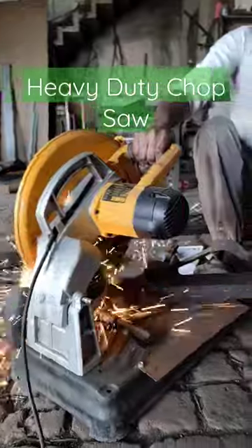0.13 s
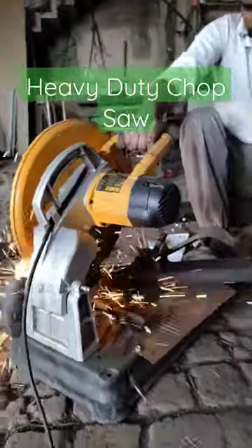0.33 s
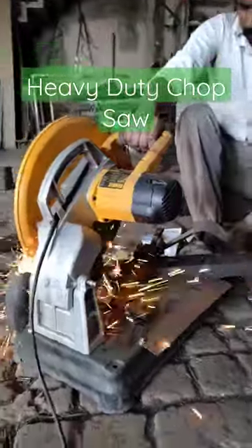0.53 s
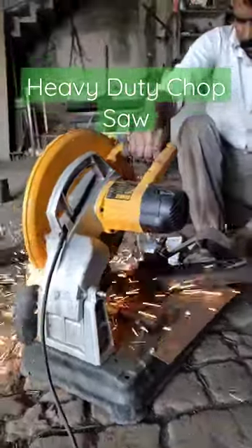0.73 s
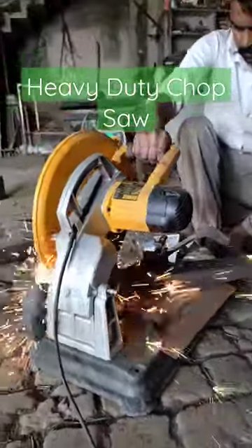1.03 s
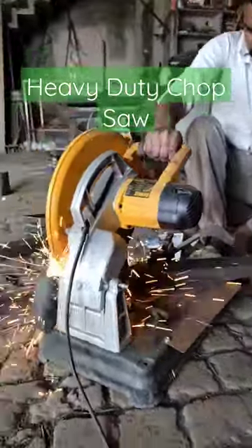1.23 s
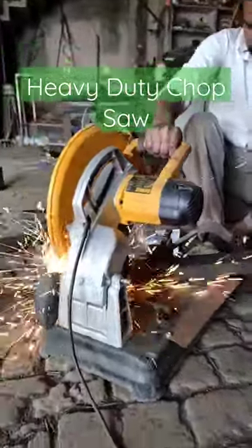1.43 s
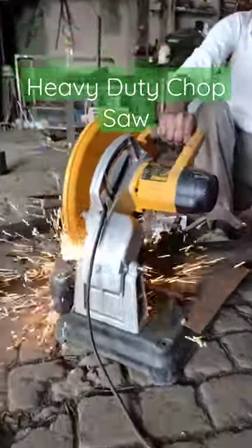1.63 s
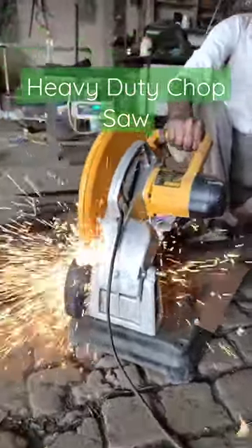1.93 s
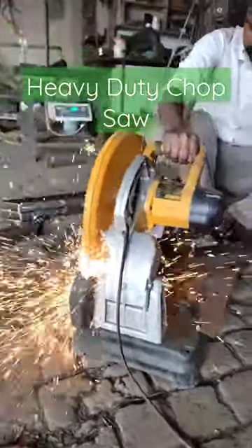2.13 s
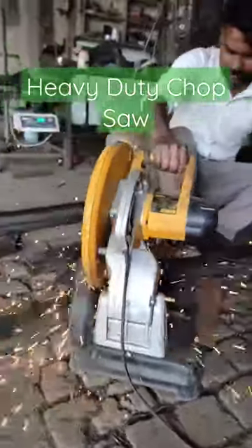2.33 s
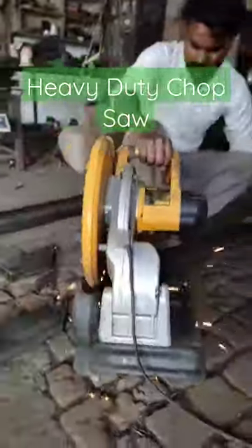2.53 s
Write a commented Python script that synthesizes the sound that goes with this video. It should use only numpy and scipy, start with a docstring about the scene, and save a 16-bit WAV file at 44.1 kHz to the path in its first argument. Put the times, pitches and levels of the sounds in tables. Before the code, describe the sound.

An abrasive chop saw grinds through steel, its whine sagging under load, then rising as it lifts.

```python
"""Gritty scraping and a sagging whine: an abrasive chop saw cuts steel about a metre away on a workshop floor.
Shaped noise and random clicks make the grit and sparks; narrowband noise makes steel, wheel and guard ring.
Fluttering sines make the motor whine, which sags as the wheel bites and rises when it lifts, a wavering snarl,
and a mains buzz that is strongest under the heaviest load. Brief squeals and a last rising ring join them;
decaying noise tails smear the sounds as a room does, and two differing channels give them width."""
import sys
import numpy as np
from scipy import signal
from scipy.fft import rfft, irfft
from scipy.io import wavfile
from scipy.ndimage import uniform_filter1d

SR = 44100
rng = np.random.default_rng(int(sys.argv[2]) if len(sys.argv) > 2 else 0)


def wav_out(sig):
    """Save sig, one row per channel (or a flat mono array), as 16-bit PCM at SR to the path in sys.argv[1]."""
    wavfile.write(sys.argv[1], SR, np.round(np.clip(np.atleast_2d(sig).T, -1, 1) * 32767).astype(np.int16))


N = 118188
T = np.arange(N) / SR  # time in s
HZ = np.maximum(np.fft.rfftfreq(N, 1 / SR), 1)

# crossovers from bass to middle and from middle to treble: split_hz
SPLIT_HZ = [900, 3500]
PINION_TEETH = 16  # gear mesh cycles per shaft turn
RIPPLE_FROM_HZ = 1800  # fine treble structure reaches full depth about here
ROOM_DB = 3  # reverberant level relative to the direct sound


def undb(db):
    """Level law: decibels become an amplitude ratio."""
    return 10 ** (np.asarray(db) / 20)


def unit(x):
    """Normalisation: scale to a root mean square of 1."""
    return x / np.sqrt(np.mean(x ** 2))


def follow(points):
    """Envelope: gain over time through (s, dB) points."""
    return undb(np.interp(T, *np.array(points).T))


def pan(db):
    """Interchannel level difference: left and right gains at constant mean power."""
    gains = undb(np.array([np.atleast_1d(db), -np.atleast_1d(db)]) / 2)
    return gains / np.sqrt(np.mean(gains ** 2, axis=0))


def across(points):
    """Spectral envelope: interpolate (Hz, value) points along log frequency."""
    hz, value = np.array(points, float).T
    return np.interp(np.log(HZ), np.log(hz), value)


def wander(hz):
    """Low-pass noise: random motion up to about the given rate, rms 1."""
    return unit(irfft(rfft(rng.standard_normal(N)) / (1 + (HZ / hz) ** 2), N))


def turn(hz):
    """Phase in radians: frequency summed over time from a random start."""
    return 2 * np.pi * (np.cumsum(hz * np.ones(N)) / SR + rng.random())


def room(x, wet_db):
    """Reverberation: convolve with exponentially decaying noise, independent in each channel."""
    decay_time_s = 0.42  # time to fall by 60 dB
    age = T[:SR // 3]
    tail = rng.standard_normal((2, len(age))) * undb(-60 * age / decay_time_s)
    tail /= np.sqrt(np.sum(tail ** 2, axis=1, keepdims=True))
    reverberant = signal.fftconvolve(tail, x[None], axes=1)[:, :N]
    wet = undb(wet_db)
    return (x + wet * reverberant) / np.sqrt(1 + wet ** 2)


def tone(phase, flutter_db, flutter_hz, jitter):
    """Random modulation: a partial flutters in level (dB) and phase (radians), rms 1."""
    carrier = np.sin(phase + jitter * wander(flutter_hz))
    return unit(carrier * undb(flutter_db * wander(flutter_hz)))


def contact(mesh):
    """Amplitude modulation: pressure rises once per wheel turn, and random chatter shakes it."""
    gear_ratio, wobble, chatter_db = 5.3, .05, .45
    wheel_hz = mesh / PINION_TEETH / gear_ratio
    return (1 + wobble * np.sin(turn(wheel_hz))) * undb(chatter_db * wander(31))


def treble_ripple():
    """Spectral ripple: narrow random peaks and valleys roughen the treble of the grinding."""
    grid = np.arange(0, SR / 2, 70)  # one random level every 70 Hz
    deviation_db = np.clip(rng.standard_normal(len(grid)), -2, 2) * np.sqrt(2)
    onset = np.minimum(HZ / RIPPLE_FROM_HZ, 1)
    return unit(undb(onset * np.interp(HZ, grid, deviation_db)))


def sparks():
    """Impulsive noise: torn-off grains make randomly timed clicks, a few much louder than the rest."""
    clicks_per_s, size_spread_db = 1600, 2.5
    size = undb(size_spread_db * np.minimum(rng.exponential(size=N), 6))
    struck = rng.random(N) < clicks_per_s / SR
    return unit(room(size * rng.standard_normal(N) * struck, wet_db=0.5))


def grinding(pressure):
    """Broadband friction: grit noise and sparks share a spectrum whose three bands have their own envelopes."""
    # spectrum of the grinding noise: frequency_hz, relative_density_db
    spectrum_points = [(18, -68), (30, -36), (123, -12.5), (256, -9.5), (292, -9.5), (369, -5.5),
                       (399, -8.5), (467, -3.5), (505, -7), (561, -7), (709, -7), (808, -5.5), (945, -6),
                       (1400, -6.5), (1720, -4), (2620, -6.5), (4090, -7), (4540, -5), (5740, -8.5),
                       (8950, -13), (12300, -11), (14300, -12.5), (15500, -19.5)]
    # level of the grinding about each band's mean: time_s, bass_db, middle_db, treble_db
    band_levels = [(0.2, -25.5, -18.5, -19), (0.24, -21, -20, -17.5), (0.37, -25.5, -17.5, -15.5),
                   (0.39, -24, -21, -18.5), (1.77, -23.5, -19.5, -17.5), (1.87, -21, -19, -16),
                   (2.27, -22, -18, -18), (2.39, -19.5, -19, -17.5), (2.46, -21.5, -21.5, -19.5),
                   (2.55, -21, -23, -16), (2.6, -24.5, -22, -16.5)]
    # difference between the two microphones: frequency_hz, left_right_db
    channel_shade = [(100, -1), (250, -1), (420, -1), (800, 1.5), (1200, 0.5), (1800, 0.5), (3000, -1),
                     (5000, -2.5), (7200, -4), (9000, -1), (11000, 5.5), (11800, 6), (14000, 2)]
    # likeness of the scraping at the two microphones: frequency_hz, correlation
    channel_likeness = [(40, 0.61), (150, 0.12), (240, 0), (320, 0.75), (600, 0.39), (1300, 0.12),
                        (3000, 0.0035), (12000, 0)]
    scrape_db, spark_db = -12, -26

    mid, side = rfft(rng.standard_normal((2, N)))
    alike = np.clip(across(channel_likeness), -.95, .95)
    opposed = np.array([[1], [-1]]) * side
    scrape = (mid * np.sqrt(1 + alike) + opposed * np.sqrt(1 - alike)) / np.sqrt(2)
    source = undb(scrape_db) * scrape + undb(spark_db) * rfft(sparks())
    colour = unit(undb(across(spectrum_points))) * treble_ripple()
    sound = source * colour * pan(across(channel_shade))

    bass, below_treble = (1 / (1 + (HZ / hz) ** 4) for hz in SPLIT_HZ)
    times, *levels = np.array(band_levels).T
    out = 0
    for band, db in zip([bass, below_treble - bass, 1 - below_treble], levels):
        out = out + irfft(sound * band, N) * undb(np.interp(T, times, db - np.mean(db)))
    return pressure * out


def rasp(x, count=5):
    """Independent band modulation: interleaved treble bands flicker at random, each on its own."""
    depth_db, rate_hz, spacing_hz = 2.4, 28, 260
    spectrum, out = rfft(x), x
    treble = 1 - 1 / (1 + (HZ / RIPPLE_FROM_HZ) ** 4)
    for k in range(count):
        # triangular bands that add up to 1 over all k
        comb = np.maximum(1 - np.abs((HZ / spacing_hz + k) % count - 1), 0)
        flicker = unit(undb(depth_db * wander(rate_hz)))
        out = out + irfft(spectrum * treble * comb, N) * (flicker - 1)
    return out


def ringing(load, pressure):
    """Resonance: rubbed guard, steel and wheel ring as narrowband noise, lower in pitch under load."""
    # resonances running freely and under the heaviest load:
    # free_hz, heavy_hz, width_hz, free_db, heavy_db, left_right_db
    resonances = [(429.8, 415, 96, -37.5, -26.5, 8.5), (819, 805, 51, -46, -27, 12),
                  (1810, 1600, 300, -25, -30.5, -1), (4660, 4500, 440, -39, -36, 0)]
    ring_fade_s, fade_db_per_s = 2.25, -36  # the rings die away from here, late in the heavy cut
    bass_room_db = -15
    rubbing = pressure * undb(fade_db_per_s * np.maximum(T - ring_fade_s, 0))
    out = 0
    for free_hz, heavy_hz, width, free_db, heavy_db, pan_db in resonances:
        phase = turn(free_hz + (heavy_hz - free_hz) * load)
        ring = unit(wander(width / 2) * np.cos(phase) + wander(width / 2) * np.sin(phase))
        level = undb(free_db + (heavy_db - free_db) * load)
        wet_db = bass_room_db if free_hz < SPLIT_HZ[0] else ROOM_DB
        out = out + pan(pan_db) * room(ring * rubbing * level, wet_db)
    return out


def whine(mesh, load):
    """Order tracking: gear, fan and bearing partials keep fixed ratios to the shaft as load shifts their levels."""
    # shaft hum: time_s, level_db
    shaft_level = [(.13, -38), (.38, -37), (.46, -31.5), (.74, -30.5), (.84, -40), (2.68, -50.5)]
    # gear mesh whine: time_s, level_db
    mesh_level = [(.13, -25.5), (.33, -23), (.45, -27.5), (.7, -27.5), (.95, -25), (1.08, -30),
                  (1.18, -28.5), (1.3, -36), (1.6, -33), (1.8, -45), (2.05, -31), (2.2, -23.5), (2.27, -35),
                  (2.37, -32), (2.42, -20.5), (2.5, -22), (2.54, -31), (2.68, -37)]
    # second, lower whine: time_s, level_db
    lower_level = [(.13, -36), (.42, -29), (.55, -36), (.77, -38), (.83, -24), (1.02, -24), (1.07, -28),
                   (1.2, -23), (1.38, -22), (1.5, -25.5), (1.65, -26.5), (1.8, -52)]
    # third, lowest whine: time_s, level_db
    lowest_level = [(.13, -29), (.35, -28.5), (.5, -31), (.63, -22), (.74, -23), (.85, -38), (1.2, -50)]
    # weaker partials: multiple_of_shaft_rate
    weak_orders = [1.28, 3.03, 3.53, 3.81, 4.06, 4.42, 4.84, 5.88, 6.94, 17.83, 22.53]
    # their levels before release, in the same order: free_db, cutting_db, heavy_db, left_right_db
    weak_levels = [(-30, -31.5, -42, -1), (-34, -38, -52, 11), (-33, -40, -34, 3), (-35, -78, -32, 9),
                   (-45, -27.5, -71, 4), (-25, -32.5, -48, 10), (-62, -32, -31.5, -4), (-29, -30.5, -53, 5),
                   (-27, -37.5, -53, -1), (-83, -80, -52, -3), (-34.5, -39, -36, 10)]

    shaft = mesh / PINION_TEETH * (1 + 0.00065 * wander(6.7))
    out = follow(shaft_level) * tone(turn(shaft), flutter_db=3.5, flutter_hz=14, jitter=0.096)
    strong = ((PINION_TEETH, mesh_level), (14.44, lower_level), (14, lowest_level))
    for multiple, curve in strong:
        line = follow(curve) * tone(turn(multiple * shaft), flutter_db=3.4, flutter_hz=50, jitter=.7)
        out = out + pan(-10) * room(line, wet_db=-12)

    # the weaker partials drop as the wheel leaves the steel
    release_s, release_db = 2.41, -6.5
    released = np.interp(T, [release_s - .04, release_s], [0, 1])
    for multiple, (free, cutting, heavy, pan_db) in zip(weak_orders, weak_levels):
        db = np.interp(load, [0, .5, 1], [free, cutting, heavy]) + release_db * released
        line = undb(db) * tone(turn(multiple * shaft), flutter_db=1.5, flutter_hz=31, jitter=0.13)
        out = out + pan(pan_db) * room(line, ROOM_DB)
    return out


def snarl(mesh, load):
    """Frequency modulation: a rough, wavering tone sinks with the motor, a little less than the shaft does."""
    # rough tone in the middle register: time_s, level_db
    snarl_level = [(.13, -30), (.6, -31), (.85, -28), (1, -33), (1.2, -24.5), (1.45, -25), (1.6, -33),
                   (2.2, -35), (2.4, -44)]
    multiple = 5.24 + .4 * load  # of the shaft rate
    hz = mesh / PINION_TEETH * multiple * (1 + .005 * wander(19.8))
    line = tone(turn(hz), flutter_db=3, flutter_hz=45, jitter=.65)
    return pan(-0.5) * room(follow(snarl_level) * line, wet_db=-7)


def buzz():
    """Electromagnetic vibration: windings buzz near mains harmonics, whose balance shifts as the motor labours."""
    # lines before the overall level: frequency_hz, early_db, late_db
    buzz_lines = [(200, -40, -41), (296, -33, -30), (400, -28.5, -22), (501, -24, -29), (805, -27, -33),
                  (1100, -37, -37)]
    # overall gain of the buzz: time_s, gain_db
    buzz_level = [(.13, -22), (1.2, -10), (1.86, -9), (1.92, 0), (2.41, 0), (2.47, -16), (2.68, -20)]
    # start and end of the shift in balance: time_s
    labour_times = [1.95, 2.25]
    lines = 0
    for hz, early, late in buzz_lines:
        level = undb(np.interp(T, labour_times, [early, late]))
        lines = lines + level * tone(turn(hz), flutter_db=2.8, flutter_hz=15, jitter=.55)
    return pan(4.5) * room(lines * follow(buzz_level), wet_db=-14)


def squeaks():
    """Stick-slip friction: short, rough, falling squeals as the wheel sticks to the side of the slot."""
    # squeals at their peaks, with half-lengths: time_s, pitch_hz, half_length_s, level_db
    squeals = [(0.68, 2180, .05, -29), (1.785, 3180, .045, -19.5), (2.046, 2176, .05, -27),
               (2.335, 1370, .04, -25)]
    glide_hz_per_s = -800
    out = 0
    for time, hz, half_length, db in squeals:
        since = np.clip(T - time, -half_length, half_length)
        swell = np.cos(np.pi / 2 * since / half_length) ** 2
        squeal = tone(turn(hz + glide_hz_per_s * since), flutter_db=4.5, flutter_hz=60, jitter=.9)
        out = out + undb(db) * swell * squeal
    return room(out, wet_db=-9)


def free_ring():
    """Free vibration: clear of the steel, the wheel sings briefly and rises as it speeds up."""
    # song of the freed wheel: time_s, pitch_hz, level_db
    song = [(2.4, 1790, -50), (2.44, 1830, -27), (2.5, 1900, -24), (2.59, 1930, -26), (2.68, 1960, -38)]
    times, hz, db = np.array(song).T
    line = tone(turn(np.interp(T, times, hz)), flutter_db=4, flutter_hz=50, jitter=1.)
    return room(undb(np.interp(T, times, db)) * line, wet_db=-7)


def scene():
    """Rotational inertia: motor speed and acceleration give the load, which shifts partials, snarl and rings."""
    # motor speed as gear mesh rate: time_s, mesh_hz
    motor_speed = [(0, 5432), (.33, 5430), (.5, 5365), (.75, 5245), (1, 5135), (1.25, 5050), (1.5, 4985),
                   (1.7, 4910), (2.05, 4670), (2.22, 4600), (2.37, 4500), (2.41, 4610), (2.5, 5110),
                   (2.6, 5430), (2.69, 5620)]
    # mesh rate running freely, in the cut and under the heaviest load: mesh_hz
    load_rates = [5483, 5071, 4570]
    inertia_s = .15  # the speed lags the load by this much
    mesh = np.interp(T, *np.array(motor_speed).T)
    acceleration = uniform_filter1d(np.gradient(mesh, T), size=1500)
    heading_for = mesh + inertia_s * acceleration
    # negated because interpolation needs rising points
    load = np.interp(-heading_for, -np.array(load_rates), [0, .5, 1])
    pressure = contact(mesh)
    cutting = rasp(grinding(pressure)) + ringing(load, pressure) + squeaks()
    return cutting + whine(mesh, load) + snarl(mesh, load) + buzz() + free_ring()


def record(dry):
    """Band limiting: the sound cuts in with the saw at work, clips at full scale and loses its top."""
    start_s, fade_s, top_hz = 0.1307, 0.014, 15400
    fade = np.clip((T - start_s) / fade_s, 0, 1)
    sound = np.clip(dry * fade, -1, 1)
    low_pass = signal.ellip(10, .2, 80, top_hz, fs=SR, output="sos")
    return signal.sosfilt(low_pass, sound)


dry = scene()
out = record(dry)
wav_out(out)
```